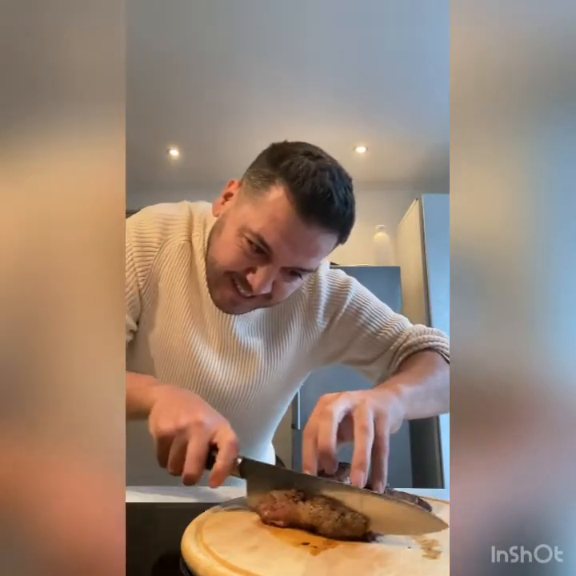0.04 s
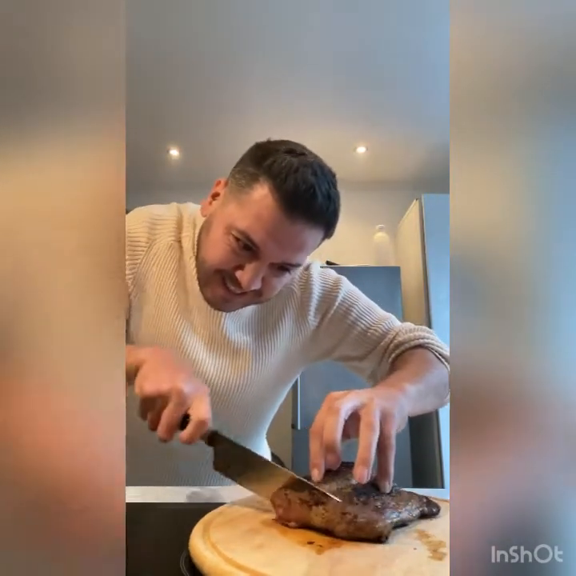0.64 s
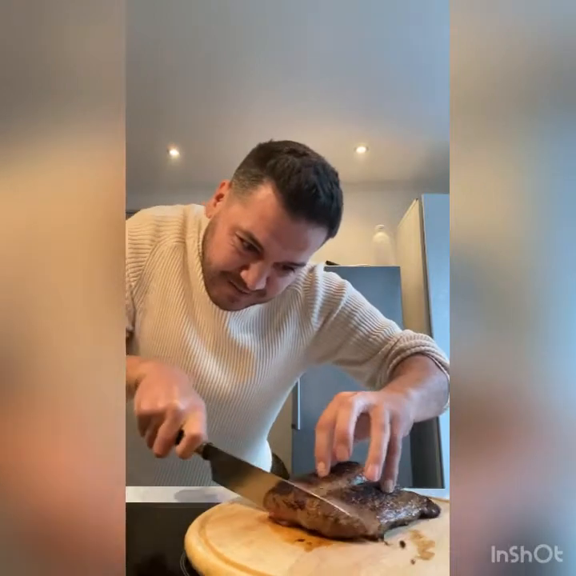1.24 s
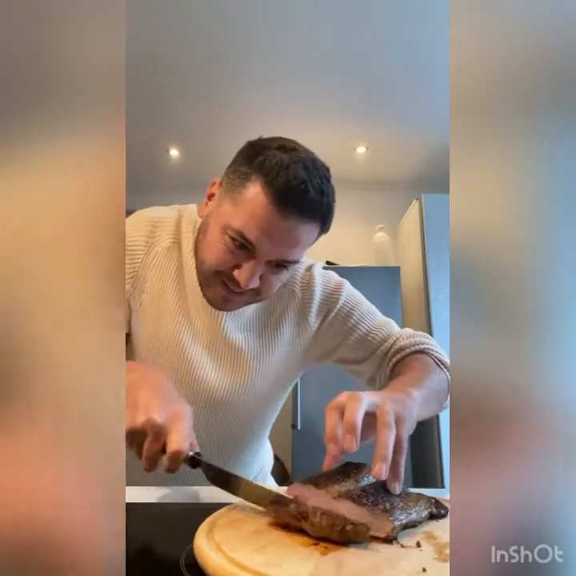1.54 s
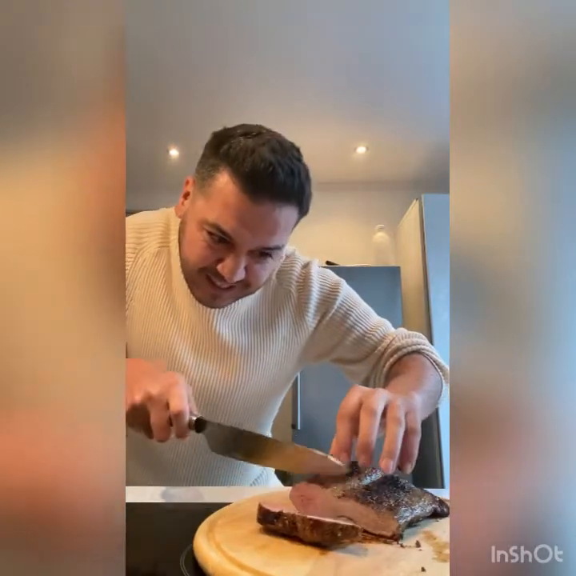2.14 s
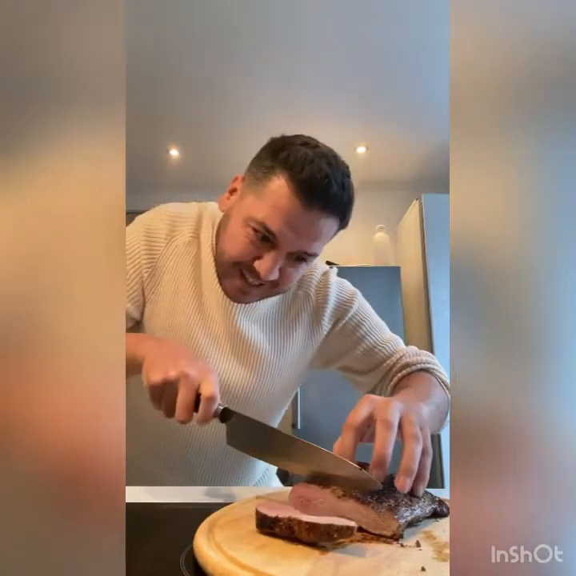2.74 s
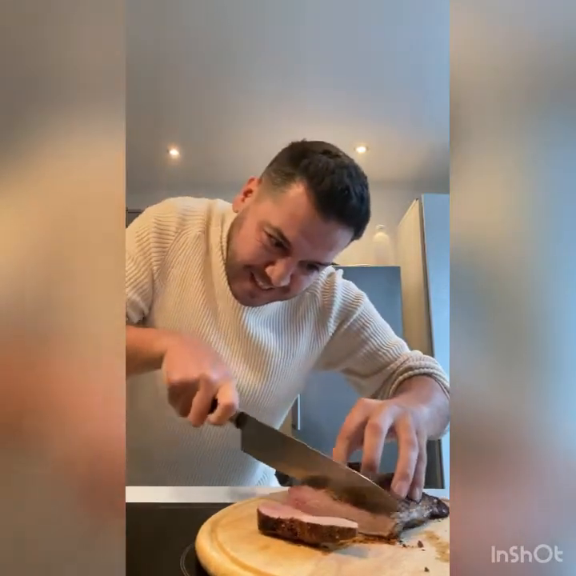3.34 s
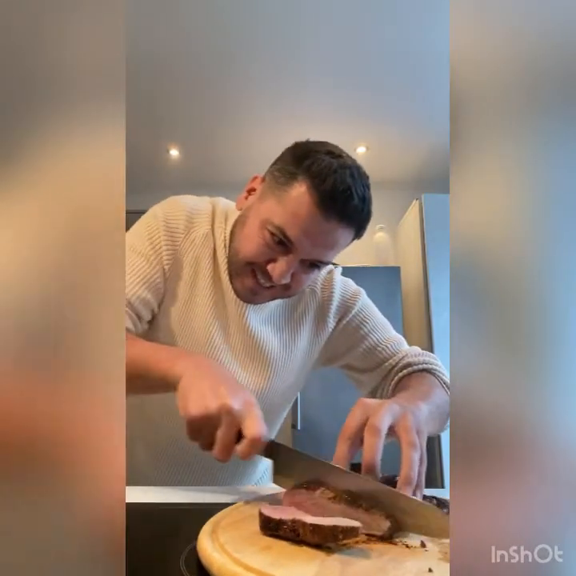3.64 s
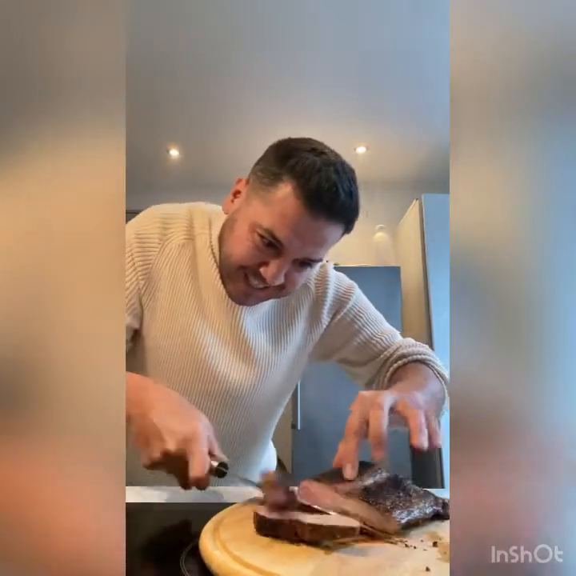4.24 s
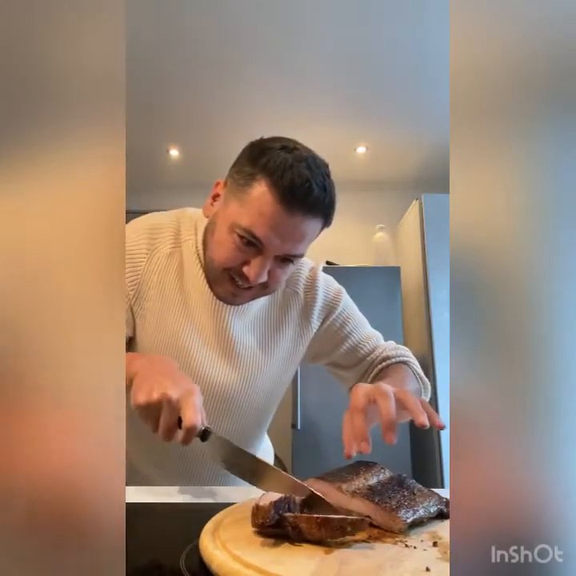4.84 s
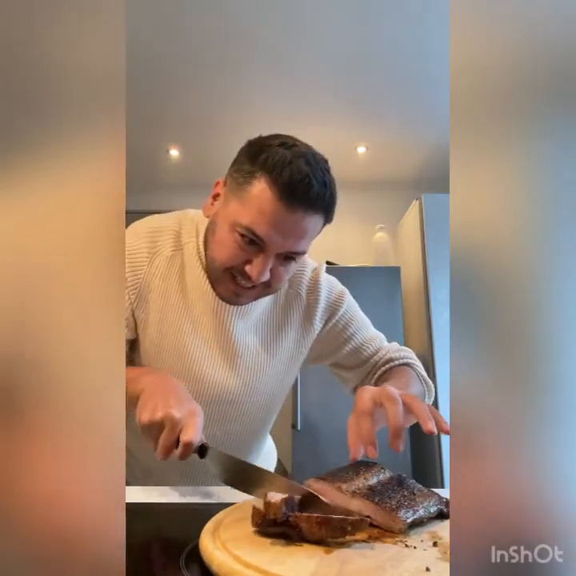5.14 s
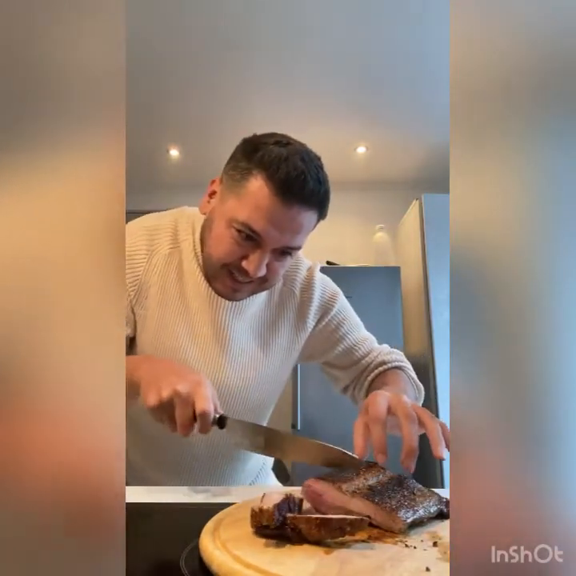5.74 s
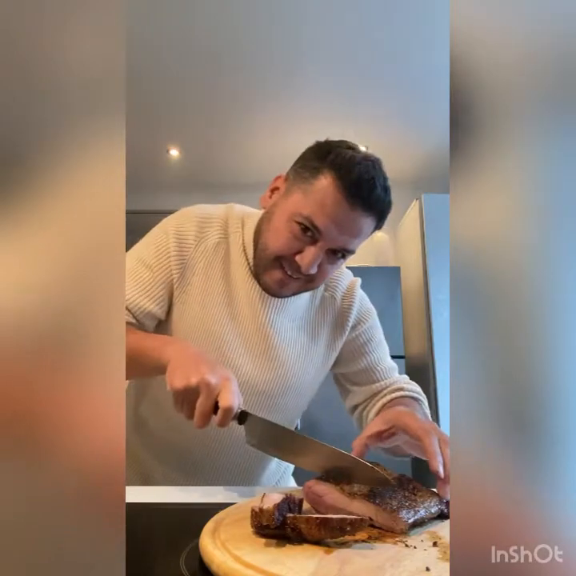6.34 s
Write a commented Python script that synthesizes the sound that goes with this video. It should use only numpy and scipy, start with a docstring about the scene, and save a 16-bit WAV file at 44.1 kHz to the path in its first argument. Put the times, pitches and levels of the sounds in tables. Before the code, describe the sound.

An extractor fan drones low while a kitchen knife softly crackles through seared meat, clicking and knocking on a wooden board.

```python
"""In a small kitchen, a chef's knife slices a seared steak on a wooden board under an extractor fan.
Turbulent air rumbles and hisses in the fan's duct. Fracture of crust and fibres makes the edge rasp
and crackle, and stick-slip friction on wet meat makes it squeak softly. Impacts excite the modes of
the steel, which ticks as it breaks through, and of the board, which knocks as the edge lands.
The loudest knock makes a limiter duck the fan for a moment."""
import sys
import numpy as np
from scipy import signal
from scipy.fft import rfft, irfft
from scipy.io import wavfile
from scipy.ndimage import uniform_filter1d, minimum_filter1d

SR = 44100
rng = np.random.default_rng(int(sys.argv[2]) if len(sys.argv) > 2 else 0)


def store_wav(level_fs):
    """Save 16-bit WAV to argv[1]."""
    pcm = np.round(np.clip(np.atleast_2d(level_fs), -1, 1) * 32767)
    wavfile.write(sys.argv[1], SR, pcm.T.astype(np.int16))


N = 289737
TIME = np.arange(N) / SR
BIN_HZ = np.maximum(np.arange(N // 2 + 1) * SR / N, 1)


def from_db(db):
    """Amplitude grows tenfold for every 20 decibels."""
    return 10 ** (np.asarray(db) / 20)


def unit_rms(x):
    """Normalisation to an rms of 1."""
    return x / np.sqrt(np.mean(x ** 2) + 1e-20)


def over_bins(points):
    """Linear interpolation of (frequency_hz, value) points on a log-frequency axis."""
    hz, value = np.transpose(points)
    return np.interp(np.log(BIN_HZ), np.log(hz), value)


def coloured(x, db):
    """Zero-phase filtering: each frequency bin takes its own gain."""
    return irfft(rfft(x) * from_db(db), N)


def cut(x, hz, kind, order=2):
    """Causal low-pass or high-pass filtering with a maximally flat passband."""
    sections = signal.butter(order, min(hz, .45 * SR), kind, fs=SR, output="sos")
    return signal.sosfilt(sections, x + 1e-18)


def dying_noise(t60):
    """Exponential decay: noise starts at rms 1 and loses 60 dB in t60 seconds."""
    age = TIME[:SR // 2]
    return rng.standard_normal(len(age)) * from_db(-60 * age / t60)


def add(track, start_s, sound):
    """Superposition: a sound sums into a track from its start time."""
    start = round(start_s * SR)
    track[start:start + len(sound)] += sound[:N - start]


def swell(peak_s, rise_s, fall_s):
    """A Gaussian envelope of height 1, with a separate standard deviation on each side."""
    return np.exp(-.5 * ((TIME - peak_s) / np.where(TIME < peak_s, rise_s, fall_s)) ** 2)


def grains(per_s, spread_db):
    """A Poisson process: clicks at independent moments, most small and a few large."""
    sizes = from_db(spread_db * np.minimum(rng.exponential(1, N), 5)) * rng.choice([-1, 1], N)
    return sizes * (rng.random(N) < per_s / SR)


def ring(blows, modes):
    """Modal response: each blow excites every mode as a damped sinusoid, alternating in sign."""
    out = np.zeros(N)
    for k, (hz, db, t60) in enumerate(modes):
        radius, angle = from_db(-60 / (t60 * SR)), 2 * np.pi * hz / SR
        feedback = [1, -2 * radius * np.cos(angle), radius * radius]
        out += (-1) ** k * from_db(db) * signal.lfilter([0, np.sin(angle)], feedback, blows + 1e-18)
    return out


def fan(air_db=-17.5, left_lag_samples=4):
    """Turbulence excites the duct's resonances over the motor's hum; the middle band is diffuse."""
    # direct sound, common to both microphones but reaching the left slightly later:
    # frequency_hz, relative_density_db
    direct_spectrum = [(25, -30), (42, -18.5), (60, -1), (100, -1.3), (200, 0.46), (400, -16), (700, -24.5),
                       (1300, -23), (2300, -22), (4500, -28.5), (6000, -37), (9000, -43), (12500, -47.5),
                       (15000, -57)]
    # sound scattered by the room, added left and subtracted right: frequency_hz, relative_density_db
    diffuse_spectrum = [(25, -54), (50, -52), (120, -51), (250, -53), (400, -27), (650, -42), (1050, -20.5),
                        (2000, -24), (3000, -33), (4200, -31.5), (5200, -48), (8000, -47.5), (10500, -102),
                        (15000, -84)]
    # resonances of hood, duct and room: centre_hz, width_hz, lift_db
    resonances = [(118.1, 20.3, 11.5), (157, 26.4, 3), (216.2, 21.6, 6), (308.8, 20.5, 6.5), (344, 34, 6),
                  (385.2, 35, 6.5), (508.5, 99, 9.5), (629, 85, 7), (690, 14.4, 10), (765.5, 38, 7),
                  (887, 103, 9), (1123, 9.4, 8), (1220, 15, 4.5), (1731, 14, 9), (1987, 13, 9),
                  (2148, 157, 4.5), (2446, 26, 8), (2665, 44, 5)]
    # standing waves favour one microphone: frequency_hz, left_minus_right_db
    balance = [(50, 0), (130, -.7), (250, -.6), (390, -2.2), (520, .2), (740, -2.2), (1000, 0), (1250, 2.5),
               (1450, 1), (1900, 3.2), (2740, .8), (4200, .3), (6400, -.4), (10000, 0)]
    # steady tones of the motor: pitch_hz, rms_db
    motor_tones = [(59.4, -43.5), (118.6, -28)]
    lift_db = sum(db * np.exp(-2 * ((BIN_HZ - hz) / width) ** 2) for hz, width, db in resonances)
    direct = coloured(rng.standard_normal(N), over_bins(direct_spectrum) + lift_db)
    diffuse = coloured(rng.standard_normal(N), over_bins(diffuse_spectrum) + lift_db)
    lean_db = over_bins(balance) / 2
    left = np.roll(coloured(direct + diffuse, lean_db), left_lag_samples)
    right = coloured(direct - diffuse, -lean_db)
    hum = sum(from_db(db) * np.sqrt(2) * np.sin(2 * np.pi * (hz * TIME + rng.random()))
              for hz, db in motor_tones)
    return from_db(air_db) * unit_rms(np.array([left, right])) + hum


def slicing(snaps_per_s=550, size_spread_db=1.0, fall_over_rise=0.63, squeak_over_rasp_db=11):
    """Dense tiny fractures of crust and fibres merge into a rasp; the same jerks excite the steel."""
    # pulls of the edge through crust and meat: peak_s, rise_s, level_db
    strokes = [(.325, 0.055, -53), (.52, 0.028, -52.5), (.66, 0.022, -52), (.84, 0.017, -57),
               (.95, 0.018, -48.5), (1.0, 0.013, -47), (1.14, 0.052, -60), (1.645, 0.03, -53.5),
               (3.08, 0.043, -59), (3.45, .05, -61), (3.785, .012, -55), (3.885, 0.06, -53),
               (4.185, 0.032, -51.5)]
    # spectrum of the rasp: frequency_hz, relative_density_db
    rasp_spectrum = [(600, -20), (1500, -10), (2700, 13), (5300, 8), (6900, 13), (8300, 4), (10500, 21),
                     (13500, 16), (16000, -15)]
    # modes of the steel as wet meat slides along it: pitch_hz, relative_db, t60_s
    squeak_modes = [(2430, -8, 0.018), (2660, 6, 0.0028), (3500, -15, 0.0096)]
    pull = sum(from_db(db) * swell(s, rise_s, fall_over_rise * rise_s) for s, rise_s, db in strokes)
    snaps = grains(snaps_per_s, size_spread_db)
    rasp = unit_rms(coloured(snaps, over_bins(rasp_spectrum)))
    squeak = from_db(squeak_over_rasp_db) * unit_rms(ring(snaps, squeak_modes))
    return pull * (rasp + squeak)


def crackle(pops_per_s=160, size_spread_db=3.0, pop_t60=.007, snap_t60=.014, band_hz=(6530, 13000)):
    """Brittle fracture snaps larger bits of crust one by one; films of juice rupture in faint pops."""
    # crust breaking under the edge: start_s, level_db
    crust_snaps = [(.33, -41), (.342, -36), (.362, -37), (.512, -37), (.6575, -29), (.824, -34),
                   (.8515, -32), (.934, -33), (.946, -28), (.967, -32), (.986, -34), (1.001, -35),
                   (1.0515, -36), (1.1505, -39), (1.6495, -40), (3.083, -42), (4.164, -39), (4.179, -40),
                   (4.19, -37)]
    # spells with the blade in wet meat: middle_s, half_length_s, level_db
    wet_spells = [(.4, .15, -57), (1.4, 0.22, -57), (3.2, 0.2, -58), (4.05, 0.12, -51)]
    snaps = np.zeros(N)
    for start_s, db in crust_snaps:
        add(snaps, start_s, from_db(db) * dying_noise(snap_t60))
    wetness = sum(from_db(db) * swell(s, half_s, half_s) for s, half_s, db in wet_spells)
    noise = rng.standard_normal(N)
    ruptures = np.abs(grains(pops_per_s, size_spread_db))
    pop_envelope = signal.lfilter([1], [1, -from_db(-60 / (pop_t60 * SR))], ruptures + 1e-18)
    pops = wetness * unit_rms(noise * pop_envelope)
    return cut(cut(snaps + pops, band_hz[0], "high", order=3), band_hz[1], "low", order=4)


def squeaks_and_chatter(waver_share=0.0273, waver_hz=150):
    """Stick-slip on wet meat gives squeaks; the blade rings in one short chatter as it breaks through."""
    # brief gliding tones, the loudest being the chatter:
    # middle_s, half_length_s, pitch_hz, glide_hz_per_s, level_db
    tones = [(.279, .003, 2250, -15000, -32), (0.3, 0.0033, 2500, 5999.5, -27),
             (0.672, 0.0018, 2330, 3001, -17), (1.0127, 0.001, 2800, 2999, -9),
             (1.47, .003, 2430, 5001, -33), (1.488, .003, 2770, 12999, -28)]
    unsteady = 1 + waver_share * unit_rms(cut(rng.standard_normal(N), waver_hz, "low"))
    out = np.zeros(N)
    for middle_s, half_s, hz, glide, db in tones:
        cycles = np.cumsum((hz + glide * (TIME - middle_s)) * unsteady) / SR
        out += from_db(db) * swell(middle_s, half_s, half_s) * np.sin(2 * np.pi * cycles)
    return out


def blade(crack_t60=0.016, crack_hz=(6000, 13000), scrape_hz=(1600, 4500), rebound_ring_db=-1):
    """Impact and one rebound each crack, scrape and ring the steel. Returns (contact noise, ring)."""
    # the blade breaks through or catches:
    # start_s, crack_db, scrape_db, scrape_t60_s, ring_db, rebound_delay_s, rebound_db
    ticks = [(0.2928, -28, -29, .02, -24, 0.012, -5), (0.6713, -18, -18, 0.02, -27, 0.0016, -12),
             (0.6839, -17, -13, 0.032, -17, .0025, -12), (1.0107, -16.5, -16.5, 0.05, -12, 0.0117, -7),
             (1.6746, -33, -37, .02, -45, 0.0047, -10), (3.412, -30.5, -38, .02, -42, .011, -10),
             (3.7936, -27.5, -17, 0.04, -17, .007, -6)]
    # modes of the blade, damped by meat and hand: pitch_hz, gain_db, t60_s
    steel_modes = [(880, -15, .01), (1620, -21, 0.014), (2120, -12, 0.021), (2540, 5, 0.011),
                   (2920, -2, 0.0099), (3250, -5, 0.006), (3830, -9, 0.0085), (7000, -13.5, 0.0056),
                   (9050, -10, 0.0043), (12400, -8.5, .004)]
    cracks, scrapes, blows = np.zeros((3, N))
    for start_s, crack_db, scrape_db, scrape_t60, ring_db, rebound_s, rebound_db in ticks:
        touches = (start_s, 0, 0), (start_s + rebound_s, rebound_db, rebound_ring_db)
        for touch_s, touch_db, touch_ring_db in touches:
            add(cracks, touch_s, from_db(crack_db + touch_db) * dying_noise(crack_t60))
            add(scrapes, touch_s, from_db(scrape_db + touch_db) * dying_noise(scrape_t60))
            add(blows, touch_s, from_db([ring_db + touch_ring_db]))
    cracks = cut(cut(cracks, crack_hz[0], "high", order=3), crack_hz[1], "low", order=3)
    scrapes = cut(cut(scrapes, scrape_hz[0], "high"), scrape_hz[1], "low", order=4)
    return cracks + scrapes, ring(blows, steel_modes)


def board(skid_db=-22, skid_t60=0.018, skid_low_hz=1000):
    """Impact excitation: the edge bites, skids and lands; softer contact rings only the low modes."""
    # the edge meets the board:
    # start_s, bite_db, bite_cutoff_hz, landing_delay_s, landing_db, landing_cutoff_hz
    knocks = [(0.6862, 2.5, 3300, 0.005, 3, 1740), (1.0098, -20, 2476, .0117, -16, 2400),
              (3.4557, -15, 6000, 0.00296, 2, 535), (3.792, -29, 2400, 0.0036, -11, 950)]
    # modes of the board on the worktop: pitch_hz, gain_db, t60_s
    wood_modes = [(317, -14.5, 0.074), (421, -13, 0.039), (597, -16, 0.022), (780, -13, 0.015),
                  (915, -13, 0.024), (1275, -6.5, 0.025), (1400, -3, 0.011), (1555, -3, 0.017),
                  (1970, -4.5, 0.0094), (2440, -6.5, 0.012), (2820, -9, .009), (3300, -12, 0.007),
                  (3900, -16.5, 0.0062)]
    blows, click = np.zeros(N), signal.unit_impulse(SR // 100)
    for start_s, bite_db, bite_hz, land_s, land_db, land_hz in knocks:
        add(blows, start_s, from_db(bite_db) * cut(click, bite_hz, "low"))
        # the skid is too light to shake the lowest modes
        skid = cut(cut(dying_noise(skid_t60), bite_hz, "low"), skid_low_hz, "high")
        add(blows, start_s, from_db(bite_db + skid_db) * skid)
        add(blows, start_s + land_s, from_db(land_db) * cut(click, land_hz, "low"))
    return ring(blows, wood_modes)


def kitchen(x, early_db=-4, early_t60=0.014, early_low_hz=704, tail_db=-7.5, tail_t60=0.23, gap_s=.003):
    """Reverberation: early reflections off worktop and cupboards, then a tail, different on each side."""
    # colour of the reverberant tail: frequency_hz, gain_db
    tail_spectrum = [(100, -18), (600, -11), (1000, 7), (1280, 11), (1600, 5), (2050, 12.5), (2700, 9),
                     (3600, 16.5), (6000, 10), (8500, 9.5), (15000, 7)]
    sides = []
    for _ in range(2):
        early, tail = np.zeros((2, N))
        for track, t60, db in ((early, early_t60, early_db), (tail, tail_t60, tail_db)):
            reflections = dying_noise(t60)
            add(track, gap_s, from_db(db) * reflections / np.linalg.norm(reflections))
        # nearby surfaces are too small to reflect the bass
        response = cut(early, early_low_hz, "high") + coloured(tail, over_bins(tail_spectrum))
        sides.append(signal.fftconvolve(x, response[:SR // 2])[:N])
    return np.array(sides)


def widened(x):
    """Phase difference: a near sound reaches the two microphones equally loud but out of step."""
    # stereo width of the microphone pair: frequency_hz, side_minus_mid_db
    width = [(300, -13), (900, -2), (1300, 4), (2000, -4), (2800, -1), (4200, -4), (6500, 12), (8000, -3),
             (10000, -22), (12000, -9), (15000, 8)]
    side = irfft(1j * rfft(x) * from_db(over_bins(width)), N)
    return np.array([x + side, x - side])


def limiter(x, ceiling_db=0.5, release_db_per_s=24, window_samples=89):
    """Look-ahead limiting: gain drops just before a peak above the ceiling and creeps back."""
    over_db = np.maximum(20 * np.log10(np.abs(x).max(axis=0) + 1e-9) - ceiling_db, 0)
    release_db = release_db_per_s * TIME
    held_db = np.maximum.accumulate(over_db + release_db) - release_db
    gain_db = uniform_filter1d(minimum_filter1d(-held_db, window_samples), window_samples)
    return x * from_db(gain_db)


def scene(rasp_echo_db=-5, contact_echo_db=-3, steel_echo_db=-13, board_echo_db=-3):
    """Direct and reverberant sound superpose; the knife is straight ahead, the fan off to one side."""
    air = fan()
    rasp = slicing() + crackle()
    contacts, ringing = blade()
    steel = ringing + squeaks_and_chatter()   # buried in meat, it sends little to the walls
    knocks = board()
    echo = kitchen(from_db(rasp_echo_db) * rasp + from_db(contact_echo_db) * contacts
                   + from_db(steel_echo_db) * steel + from_db(board_echo_db) * knocks)
    return rasp + widened(contacts + steel + knocks) + echo + air


def record(dry, cutoff_hz=15300):
    """Peak limiting, then band limiting by a steep elliptic low-pass."""
    low_pass = signal.ellip(10, .1, 90, cutoff_hz, fs=SR, output="sos")
    return signal.sosfilt(low_pass, limiter(dry))


dry = scene()
out = record(dry)
store_wav(out)
```